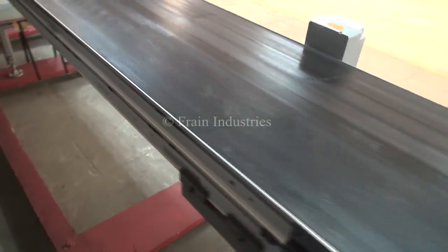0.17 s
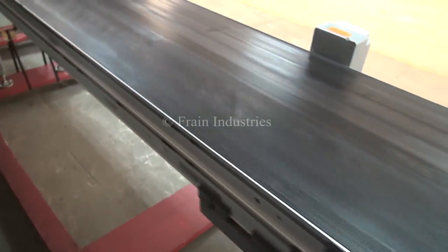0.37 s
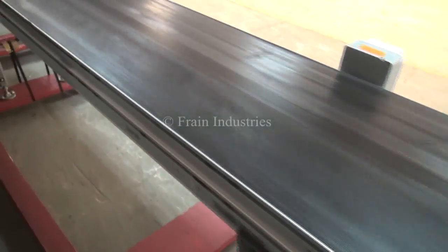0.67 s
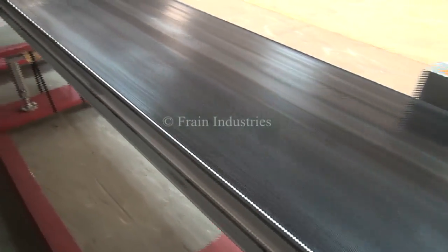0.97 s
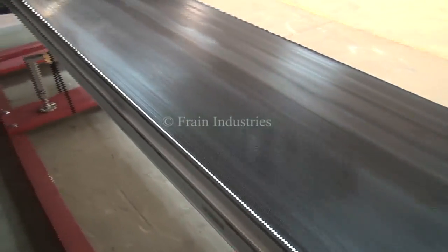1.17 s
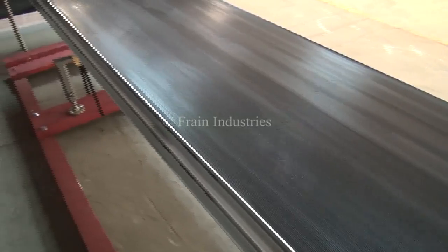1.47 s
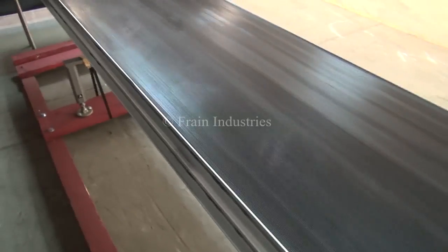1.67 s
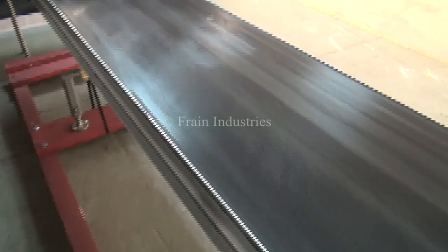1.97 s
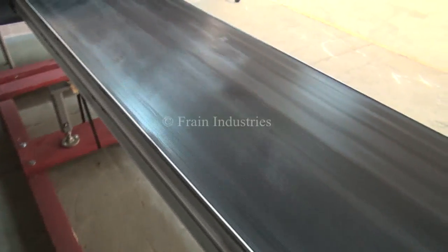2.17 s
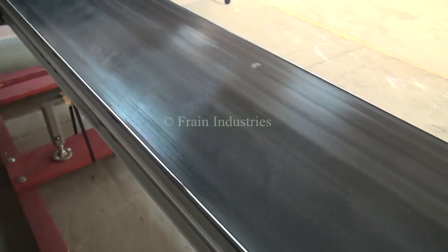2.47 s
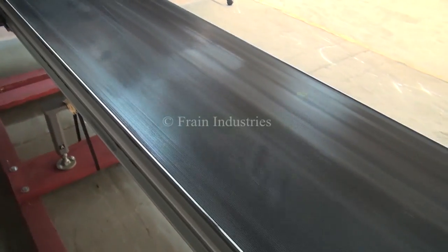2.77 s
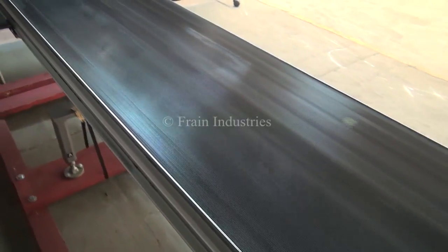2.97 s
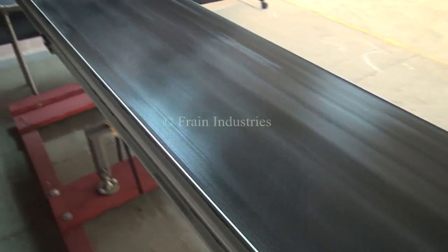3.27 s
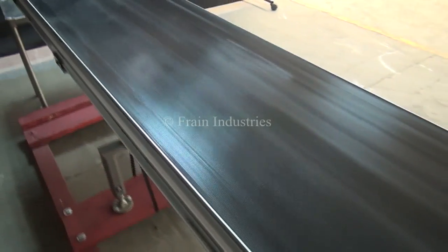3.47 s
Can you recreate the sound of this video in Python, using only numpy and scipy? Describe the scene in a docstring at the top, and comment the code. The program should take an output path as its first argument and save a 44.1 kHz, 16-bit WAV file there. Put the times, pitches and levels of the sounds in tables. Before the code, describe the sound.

A belt conveyor runs with a steady hum, rumble and sliding hiss, rubbing harder at first.

```python
"""A workshop belt conveyor

Heard from close by, the drive hums, the rollers rumble and the belt hisses over its steel bed.
At the start the belt rubs harder: the swelling friction squeals and excites the modes of the frame.
Later it scuffs once more, and a few light swishes come between. Now and then a low groan wanders
over the rumble; the main hum fades as the microphone moves along."""
import sys
import numpy as np
from scipy import signal
from scipy.fft import rfft, irfft, next_fast_len
from scipy.io import wavfile
from scipy.ndimage import uniform_filter1d, map_coordinates

SR = 44100
rng = np.random.default_rng(int(sys.argv[2]) if len(sys.argv) > 2 else 0)


def generate_wav(signal):
    """Clip the signal to [-1, 1] and save it as 16-bit WAV at the path in sys.argv[1]."""
    frames = np.transpose(np.atleast_2d(signal))
    scaled = np.clip(frames, -1, 1) * 32767
    pcm = np.round(scaled).astype(np.int16)
    wavfile.write(sys.argv[1], SR, pcm)


N = 159642

# Likeness of the noise in the two channels. Each row: frequency in Hz, coherence.
COHERENCE = [(1100, 1), (1450, .9985), (2000, .9975), (2800, .996), (3600, .97), (4500, .955), (6000, .975),
             (8000, .99)]
# Main hum of the drive. Each row: time in seconds, level in dB.
HUM_LEVEL = [(0, -32), (.5, -29), (1.0, -29), (1.6, -30), (2.4, -32), (2.9, -36), (3.62, -42)]
# Tones of motor, gears and mains. Each row: frequency in Hz, level at mid-scene in dB,
# change in dB per second as the microphone moves.
DRIVE_TONES = [(35.3, -51, 1.5), (59.5, -44.5, 3), (78.2, -44.5, 2.5), (105.3, -45.5, -3),
               (120.1, -41.5, 1.5), (143.4, -38.5, -1), (160.6, -42.5, 1), (178.8, -39, 1),
               (220.4, -39.5, 0), (236, -41.5, -0.5), (321.6, -42.5, -2.5), (2766, -55.5, -0.5)]

# Spectra of the friction noises. Each row: frequency in Hz, relative spectral density in dB.
RUMBLE_SPECTRUM = [(15, -26), (35, -21.5), (60, -3), (95, -5.5), (130, -1), (170, 1.5), (210, 2),
                   (270, -13), (400, -13.5), (900, -95)]  # rollers and frame
SLIDE_SPECTRUM = [(150, -17.5), (250, -2.5), (265, -2.5), (318, 0.5), (380, -3), (435, -1), (529, -1.5),
                  (673, -2), (758, -3.5), (1190, -7.5), (1400, -10), (1700, -11), (2790, -19),
                  (2920, -18.5), (6280, -33.5), (7860, -45), (9000, -63), (11700, -85), (19800, -120)]  # belt on the bed
SWISH_SPECTRUM = [(2500, -31), (4500, 5), (6300, 5.5), (7500, 1.5), (8500, -11.5), (9500, -30.5)]  # light brushing
BODY_SPECTRUM = [(90, -28.5), (150, -9), (220, 3), (450, -5), (680, -0.5), (1000, -6.5), (1220, -2.5),
                 (1430, -8.5), (1650, -15), (2100, -12), (3000, -20), (6000, -79)]  # dull body of a rub
RASP_SPECTRUM = [(800, -19), (2000, -13.5), (3500, 1.5), (5000, -5), (6500, -13), (8000, -28.5),
                 (9000, -45)]  # its bright rasp
THRUM_SPECTRUM = [(70, -30), (120, -0.5), (155, 16.5), (225, -4.5), (330, -9), (500, -53)]  # the bed under a rub

# Envelopes of the running noise. Each row: time in seconds, gain in dB.
RUMBLE_LEVEL = [(0, -39), (.6, -28.5), (1.15, -37.5), (1.25, -26.5), (1.65, -35.5), (2.0, -33), (2.45, -27),
                (2.65, -34), (2.9, -28.5), (3.15, -35), (3.62, -32.5)]
SLIDE_LEVEL = [(0, -24.5), (.7, -24), (1.2, -25), (2.1, -25.4), (2.65, -26), (2.88, -25), (2.99, -24.5),
               (3.12, -26), (3.62, -26.5)]
TREBLE_GAIN = [(0, -16), (.5, -9.5), (.9, -2.5), (1.1, -1.5), (1.5, 1.5), (2.0, 0.5), (2.3, 0), (2.85, 1),
               (3.03, 1), (3.62, 3)]  # the hiss dulls or brightens as the microphone turns

# Low groans and thin squeals of the belt. Each row: start in seconds, length in seconds,
# first pitch in Hz, last pitch in Hz, level in dB.
GROANS = [(0.55, 0.16, 187.2, 186.6, -26.5), (0.71, 0.2, 165, 145, -27.5), (0.905, 0.11, 170, 191, -24),
          (0.99, 0.086, 190, 194, -28.5), (1.04, 0.1, 157, 162, -25.5), (1.925, 0.18, 179.3, 177, -27),
          (1.99, .13, 197.3, 199.6, -25), (2.705, 0.11, 196, 211, -28), (2.8, 0.16, 142.8, 157, -27),
          (2.87, .11, 232.7, 226, -30.5)]
SQUEALS = [(-.02, 0.32, 1122, 1122, -31), (.13, 0.18, 1165, 1212, -30), (.17, 0.1, 1107, 1124, -35),
           (1.4, 0.17, 2710, 2710, -45)]
# Light swishes. Each row: time of the peak in seconds, level in dB.
SWISHES = [(1.005, -43.5), (1.09, -47.5), (2.049, -46.5), (2.945, -47)]
# Modes of the steel frame. Each row: frequency in Hz, relative level in dB.
FRAME_MODES = [(199.5, -23.5), (361, -24.5), (554.5, -30), (705.4, -27.5), (797, -29), (878, -40.5),
               (1147, -28), (1216, -28.5), (1464, -40.5), (1997, -39), (2261, -49)]
# Harder rubs. Each row: time of the peak in seconds, level in dB, rise and fall in dB per second,
# thrum and rasp in dB relative to that level.
RUBS = [(.225, -18, 41.7, 24.6, -13, -11), (2.945, -35, 84, 108.4, 3, -9)]


def amp(db):
    """Amplitude grows tenfold for every 20 dB."""
    return 10 ** (np.asarray(db) / 20)


def unit(x):
    """Normalisation to an rms of 1."""
    return x / np.sqrt(np.mean(np.abs(x) ** 2) + 1e-20)


def clock():
    """Sample times in seconds."""
    return np.arange(N) / SR


def along(points, hz):
    """Interpolation of (Hz, value) points on a logarithmic frequency axis."""
    freqs, values = np.transpose(points)
    return np.interp(np.log(hz + 1), np.log(freqs + 1), values)


def curve(rows):
    """Linear interpolation of (seconds, value) points at every sample."""
    return np.interp(clock(), *np.transpose(rows))


def wobble(rate):
    """Slow random modulation: a spline through rate Gaussian values a second."""
    return map_coordinates(rng.standard_normal(1024), [clock() * rate + 2], mode="wrap")


def swell(peak_s, rise, fall):
    """Exponential growth and decay are straight lines in dB; these meet at 0 dB at peak_s."""
    t = clock()
    return -np.maximum(rise * (peak_s - t), fall * (t - peak_s))


def filtered(x, response):
    """Linear filtering multiplies the spectrum by a frequency response."""
    size = next_fast_len(N + SR // 4)
    return irfft(rfft(x, size) * response(np.fft.rfftfreq(size, 1 / SR)), size)[..., :N]


def friction_noise(spectrum, patchy_db):
    """Friction gives broadband noise, uneven in time and frequency; here nearly mono, of rms 1."""
    cells = signal.stft(rng.standard_normal((2, N)), nperseg=512)[2]
    patches = uniform_filter1d(rng.standard_normal(cells.shape[1:]), size=5, axis=0)
    patches = uniform_filter1d(patches, size=14, axis=1)
    pair = signal.istft(cells * amp(patchy_db * unit(patches)), nperseg=512)[1][:, :N]

    def mid_side_response(hz):
        angle = np.arccos(np.clip(along(COHERENCE, hz), -1, 1)) / 2
        return amp(along(spectrum, hz)) * [np.cos(angle), np.sin(angle)]

    mid, side = filtered(pair, mid_side_response)
    return unit(np.array([mid + side, mid - side]))


def tone(hz, rate, waver_db, drift_rad):
    """Random modulation of level and phase broadens a sine into a narrow band, of rms 1."""
    phase = 2 * np.pi * (np.cumsum(hz * np.ones(N)) / SR + rng.random())
    return unit(amp(waver_db * wobble(rate)) * np.sin(phase + drift_rad * wobble(rate)))


def drive():
    """Periodic forces in the drive give a line spectrum: one strong hum and weaker, wavering tones."""
    hum = amp(curve(HUM_LEVEL)) * tone(hz=73, rate=13, waver_db=-0.3, drift_rad=0.056)
    from_middle_s = clock() - clock().mean()
    return hum + sum(amp(db + slope * from_middle_s) * tone(hz, rate=2.91, waver_db=3.5, drift_rad=0.11)
                     for hz, db, slope in DRIVE_TONES)


def rollers():
    """Irregular vibration of the rollers and frame radiates as a low rumble."""
    level_db = curve(RUMBLE_LEVEL) + 1.5 * wobble(22)
    return amp(level_db) * friction_noise(RUMBLE_SPECTRUM, patchy_db=1.3)


def sliding_belt():
    """Sliding friction on the bed gives a continuous hiss, whose treble varies in strength."""
    crossover_hz = 4220
    level_db = curve(SLIDE_LEVEL) + 0.2 * wobble(13)
    hiss = amp(level_db) * friction_noise(SLIDE_SPECTRUM, patchy_db=0.53)
    treble = filtered(hiss, lambda hz: 1 - 1 / (1 + (hz / crossover_hz) ** 4))
    treble_db = curve(TREBLE_GAIN) + 0.9 * wobble(16)
    return hiss - treble + treble * amp(treble_db)


def stick_slip(rows, rate, waver_db, drift_rad):
    """Short, unsteady gliding tones, probably stick-slip oscillation of the belt on a roller."""
    fade_s = 0.027
    t, out = clock(), np.zeros(N)
    for start, length, from_hz, to_hz, db in rows:
        gate = np.clip(np.minimum(t - start, start + length - t) / fade_s, 0, 1)
        hz = curve([(start, from_hz), (start + length, to_hz)])
        out += amp(db) * np.sin(gate * np.pi / 2) * tone(hz, rate, waver_db, drift_rad)
    return out


def swishes():
    """Brief, light friction gives high noise, probably where the belt edge brushes its guide."""
    envelope = sum(amp(db + swell(peak_s, rise=498, fall=294)) for peak_s, db in SWISHES)
    return envelope * friction_noise(SWISH_SPECTRUM, patchy_db=4.0)


def rubs():
    """Harder friction scrapes and excites resonance: the bed thrums and the frame rings in its modes."""
    ring_gain_db, ring_lead_s, ring_extra_fall_db_per_s = 16, 0.00048, 17.5
    rasp_steepness, rasp_lead_s = 1.5, 0.032  # the rasp peaks earlier and dies sooner
    ring = sum(amp(db + ring_gain_db) * tone(hz, rate=8.2, waver_db=0.9, drift_rad=0.43)
               for hz, db in FRAME_MODES)
    body = friction_noise(BODY_SPECTRUM, patchy_db=1.0)
    rasp = friction_noise(RASP_SPECTRUM, patchy_db=0.7)
    thrum = friction_noise(THRUM_SPECTRUM, patchy_db=1.0)
    out = np.zeros((2, N))
    for peak_s, db, rise, fall, thrum_db, rasp_db in RUBS:
        out += amp(db + swell(peak_s, rise, fall)) * (body + amp(thrum_db) * thrum)
        out += amp(db + swell(peak_s - ring_lead_s, rise, fall + ring_extra_fall_db_per_s)) * ring
        out += amp(db + rasp_db + rasp_steepness * swell(peak_s - rasp_lead_s, rise, fall)) * rasp
    return out


def scene():
    """Superposition: the sound pressures of all parts of the conveyor add."""
    groans = stick_slip(GROANS, rate=30, waver_db=2.2, drift_rad=0.41)
    squeals = stick_slip(SQUEALS, rate=46, waver_db=1.5, drift_rad=1.0)
    return sliding_belt() + rollers() + rubs() + swishes() + drive() + groans + squeals


def record(dry):
    """Band limiting: an ideal low-pass filter passes nothing above its cutoff."""
    cutoff_hz = 9200
    return filtered(dry, lambda hz: hz < cutoff_hz)


dry = scene()
out = record(dry)
generate_wav(out)
```